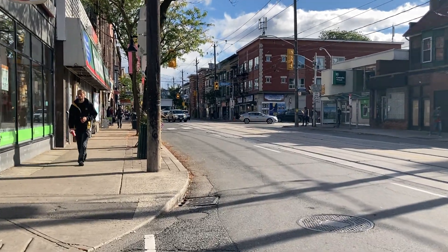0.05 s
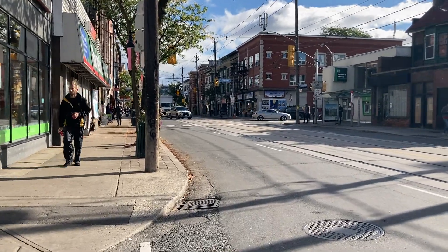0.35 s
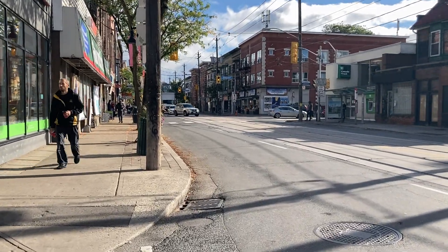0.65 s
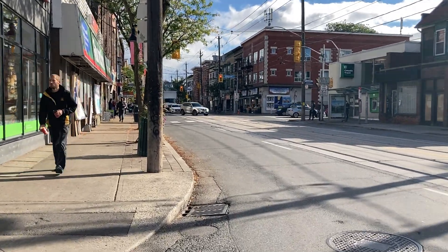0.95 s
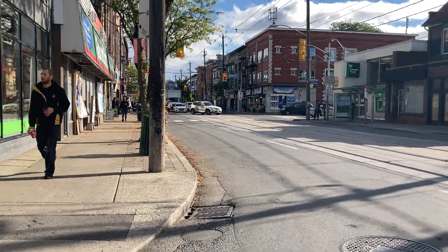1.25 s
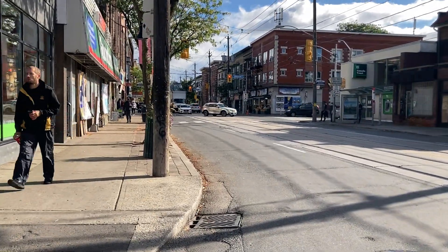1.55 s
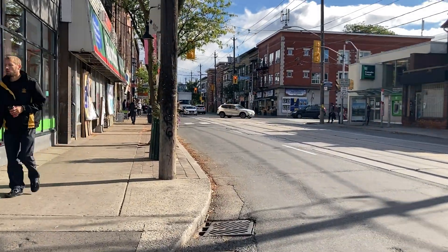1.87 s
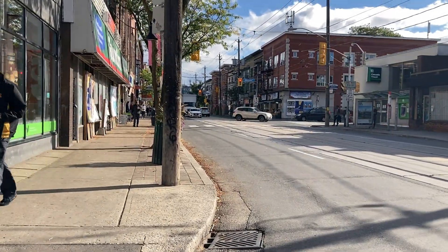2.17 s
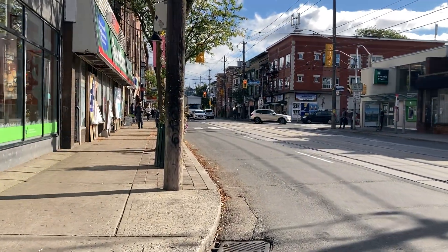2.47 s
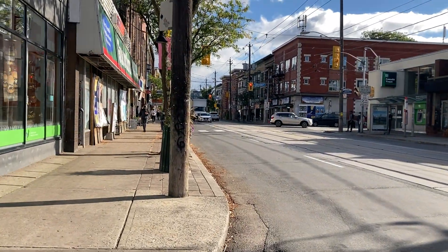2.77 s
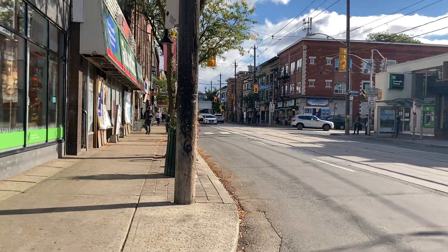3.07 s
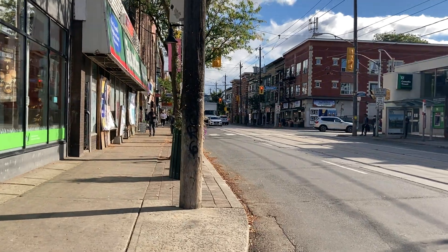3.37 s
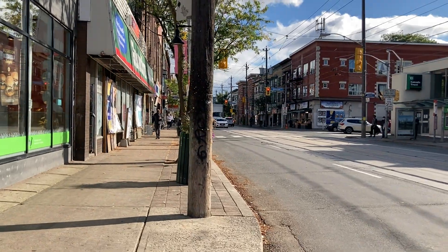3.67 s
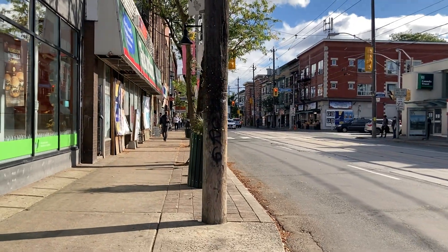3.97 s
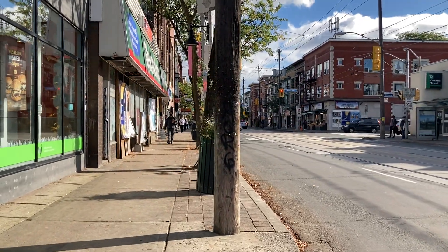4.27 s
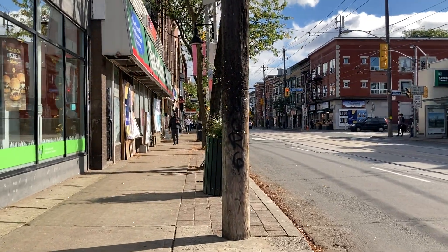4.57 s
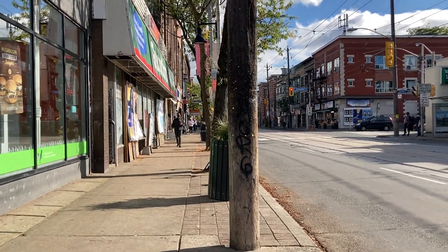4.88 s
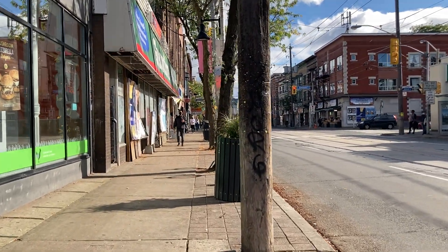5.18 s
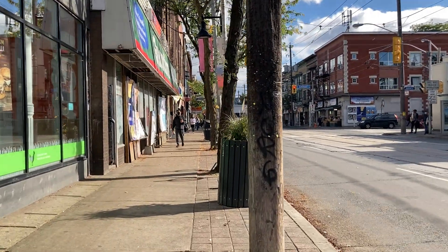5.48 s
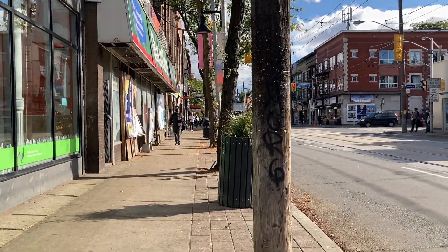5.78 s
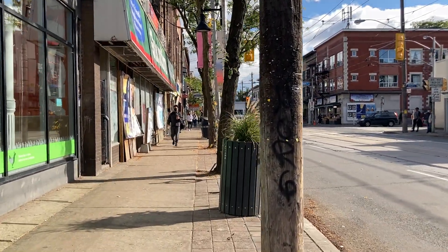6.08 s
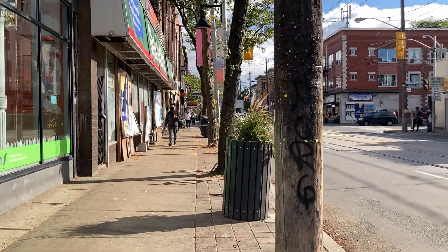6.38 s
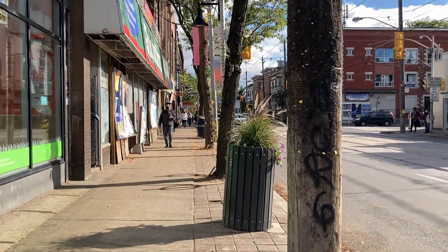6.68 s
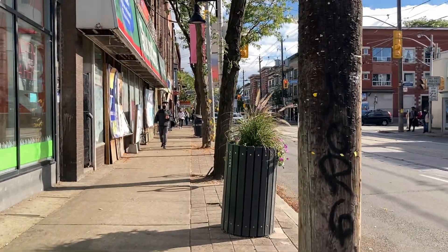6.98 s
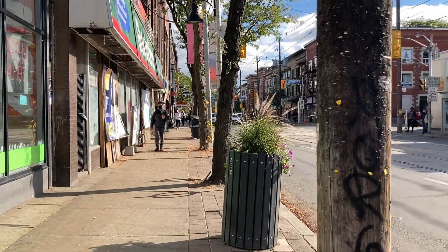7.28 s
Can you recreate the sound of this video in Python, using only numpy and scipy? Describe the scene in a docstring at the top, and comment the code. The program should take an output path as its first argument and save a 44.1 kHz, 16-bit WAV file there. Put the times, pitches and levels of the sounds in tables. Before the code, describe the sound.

Gusty wind hits the microphone with a low throb, rough flutter and pops, strongest in the first second and a half, then returning in lighter gusts. Close by, a walker's clothing swishes softly and a small metal zip pull tinkles irregularly. Distant city traffic rumbles underneath, a brake squeals faintly a couple of seconds in, and near the end one car comes slightly closer.

```python
"""A city sidewalk, walked in gusty wind.
Vortices shed at the microphone throb at a low wandering pitch, tear into rough flutter and pop.
Clothing swishes and hisses by friction; a small metal zip pull rings as it knocks against its slider.
Far traffic rumbles, a brake squeals faintly by stick-slip, and late on one car comes a little closer."""
import sys
import numpy as np
from scipy import signal
from scipy.fft import rfft, irfft, next_fast_len
from scipy.io import wavfile
from scipy.ndimage import uniform_filter1d

SR = 44100
rng = np.random.default_rng(int(sys.argv[2]) if len(sys.argv) > 2 else 0)


def digitize_waveform(pressure):
    """Quantize a signal to 16-bit integers and store it at the path in sys.argv[1].

    Rows of a 2-D input are taken as channels; values are limited to [-1, 1].
    """
    field = np.atleast_2d(pressure).T
    bounded = np.clip(field, -1, 1)
    quanta = np.round(bounded * 32767).astype(np.int16)
    wavfile.write(sys.argv[1], SR, quanta)


N = 323694
TIME = np.arange(N) / SR
USUAL_WIND_DB = -25   # reference for the strength of wind and turbulence

# the loudest eddy bursts, each part on its own relative scale: start_s, crack_db, thump_db, snap_db
POPS = [(0.223, -16, -32, -48), (0.397, -17.5, -38, -59), (0.485, -9.5, -23, -34), (0.495, -12.5, -13, -24),
        (0.543, -9.5, -22.5, -42), (0.579, -9, -1.5, -32), (0.623, -17, -9.5, -49), (0.652, -25, 1.5, -50),
        (0.728, -22.5, -2.5, -48), (0.797, -14, -24.5, -23), (0.89, -11.5, -15, -31),
        (0.898, -18, -16, -24.5), (0.957, -16, -16, -31), (0.968, -9.5, 2, -30), (1.056, -10, -22, -33),
        (1.17, -20.5, -6, -47), (1.232, -13.5, -35, -64), (1.283, -12.5, -5.5, -36),
        (1.313, -23, -25.5, -53), (1.339, -15, -21, -42.5), (1.359, -14, -4, -52),
        (1.506, -15.5, -31, -39.5), (1.534, -25, 4, -42), (1.58, -14, 2.5, -25), (2.365, -26, -17, -62),
        (2.996, -11, -2.5, -34.5), (5.394, -18.5, -11, -52), (5.555, -14, -19, -39), (5.57, -27, -1, -42),
        (5.781, -23.5, -21, -66), (6.213, -14.5, -5.5, -52), (6.382, -14.5, -8.5, -56),
        (6.468, -10, -22.5, -33), (7.065, -20.5, -26, -46)]


def from_db(db):
    """Decibels to amplitude ratio."""
    return 10 ** (np.asarray(db) / 20)


def rms_one(x):
    """Normalisation to rms 1."""
    return x / np.sqrt(np.mean(np.abs(x) ** 2) + 1e-20)


def in_time(rows):
    """Linear interpolation of each column of a timed table to every sample."""
    time_s, *columns = np.transpose(rows)
    return [np.interp(TIME, time_s, column) for column in columns]


def drift(rate_hz):
    """Smooth random fluctuation: noise low-passed at rate_hz, with rms 1."""
    pole = np.exp(-2 * np.pi * rate_hz / SR)
    return rms_one(signal.lfilter([1], [1, -2 * pole, pole * pole], rng.standard_normal(N + SR))[SR:])


def noise(colour):
    """Spectral shaping of white noise by rows of frequency_hz, relative_db; rms 1."""
    hz, level_db = np.transpose(colour)
    size = next_fast_len(N)
    bin_hz = np.maximum(np.arange(size // 2 + 1) * SR / size, 1)
    gain = from_db(np.interp(np.log(bin_hz), np.log(hz), level_db))
    return rms_one(irfft(rfft(rng.standard_normal(size)) * gain, size)[:N])


def evened(x, span_s):
    """Division by the running rms holds the level at 1 and keeps grain finer than span_s."""
    return x / np.sqrt(uniform_filter1d(np.abs(x) ** 2, max(int(span_s * SR), 2)) + 1e-9)


def clicks_at(times_s, level_db):
    """An impulse of the given level at each time."""
    clicks = np.zeros(N)
    clicks[np.clip(np.round(times_s * SR).astype(int), 0, N - 1)] = from_db(level_db)
    return clicks


def ring(clicks, hz, t60_s):
    """Damped resonator: a unit impulse starts a decaying sine of amplitude 1."""
    radius, angle = from_db(-60 / (t60_s * SR)), 2 * np.pi * hz / SR
    return signal.lfilter([0, np.sin(angle)], [1, -2 * radius * np.cos(angle), radius**2], clicks + 1e-18)


def dying(clicks, time_s):
    """Exponential decay: an envelope that jumps at each impulse and dies away."""
    return signal.lfilter([1], [1, -np.exp(-1 / (time_s * SR))], clicks + 1e-18)


def softened(x, hz):
    """Low-pass filtering rounds off everything above hz."""
    return signal.sosfilt(signal.butter(4, hz, fs=SR, output="sos"), x)


def airflow(gusty_db=2.0, gust_rate_hz=15.8):
    """Breeze and buffets add in power; the shedding rate is their power-weighted mean."""
    # breeze at the microphone: time_s, strength_db, shedding_hz
    breeze = [(0.0, -23, 130.3), (0.3, -21, 118.6), (0.42, -21.5, 155.4), (0.67, -37.5, 150.4),
              (1.11, -21, 200), (1.2, -28.5, 160.5), (1.48, -27, 128.5), (1.7, -22.5, 198.2),
              (1.9, -23.5, 177.9), (2.03, -38, 164), (2.16, -26.5, 172.1), (2.27, -35, 129.6),
              (2.5, -35.5, 151), (2.68, -32, 157.8), (3.1, -24, 145.5), (3.39, -35.5, 129.7),
              (3.44, -42.5, 125), (3.73, -33, 142), (4.0, -30, 162.2), (4.5, -32, 129.1),
              (5.12, -43, 111.8), (5.64, -26, 134.9), (5.72, -37.5, 122), (6.1, -28, 124),
              (6.52, -24, 153.3), (6.82, -39, 128.4), (7.34, -28, 137)]
    # single buffets on top of it: middle_s, strength_db, length_s, shedding_hz, extra_turbulence_db
    buffets = [(0.227, -25, 0.031, 94, 11.5), (0.497, -22, 0.019, 158.6, 11),
               (0.542, -13, 0.075, 158.2, 0.5), (0.659, -19, .08, 122.6, 2), (0.806, -12, .12, 189.5, 4.5),
               (0.896, -7.5, 0.063, 181.2, -1.5), (0.971, -17, 0.028, 161.4, 10.5),
               (1.018, -15, 0.078, 164.4, 2.5), (1.378, -15, 0.15, 123.3, -3.5),
               (1.552, -12, 0.1101, 140.1, 0), (1.903, -27, 0.075, 180.7, 9),
               (2.381, -21.5, .07, 112.7, -3.5), (2.895, -21, 0.038, 157.7, -3.5),
               (3.014, -19.5, 0.044, 149.7, -0.5), (3.608, -25, .08, 145.7, -6),
               (4.11, -19, 0.11, 128.6, -2), (4.205, -17, 0.048, 123, -19), (4.353, -24.5, 0.06, 150, -5.5),
               (4.597, -22, 0.076, 97, -16), (4.798, -22, 0.071, 147.9, -8.5),
               (4.9, -20.5, 0.076, 140.4, -12), (5.014, -28, 0.045, 99.2, -11),
               (5.25, -25.5, 0.082, 101.5, -3), (5.385, -23, 0.075, 82, 0), (5.49, -20, 0.054, 95.3, -4),
               (5.562, -15, 0.061, 148, -4), (5.644, -18, 0.036, 143.1, -7.5),
               (5.824, -20, 0.092, 137.9, -1.5), (6.308, -23, 0.047, 146.3, 1),
               (6.439, -15, 0.1, 171.3, -2.5), (7.097, -26.5, .1, 141.5, 0), (7.197, -20.5, 0.057, 147, -8)]
    breeze_db, breeze_hz = in_time(breeze)
    power = from_db(breeze_db) ** 2
    turbulence, weighted_hz = power, power * breeze_hz
    for middle_s, strength_db, length_s, hz, extra_db in buffets:
        buffet = (from_db(strength_db) * np.exp(-(2 * (TIME - middle_s) / length_s) ** 2)) ** 2
        power = power + buffet
        turbulence = turbulence + buffet * from_db(extra_db) ** 2
        weighted_hz = weighted_hz + buffet * hz
    offset_db = gusty_db * np.clip(drift(gust_rate_hz), -2, 1.5) - USUAL_WIND_DB
    return 10 * np.log10(power) + offset_db, 10 * np.log10(turbulence) + offset_db, weighted_hz / power


def shedding(hz, width_hz, span_s):
    """Vortex shedding: eddies leave an edge almost periodically, wandering in strength and phase."""
    wander = evened(drift(width_hz) + 1j * drift(width_hz), span_s)
    return np.sqrt(2) * np.real(wander * np.exp(2j * np.pi * np.cumsum(hz) / SR))


def flutter(eddies, turbulence_db, rough_db=-34, torn_db=-61, torn_growth=1.86, crest_db=3.0):
    """Turbulent noise comes in lumps, strongest on eddy crests; its tearing edge grows fastest."""
    # spectra of the rough flutter and the tearing edge: frequency_hz, relative_db
    rough_colour = [(110, -33.5), (200, 4), (300, -1), (450, -8), (700, -14.5), (1000, -21), (1500, -34),
                    (2500, -49.5), (5000, -79.5)]
    torn_colour = [(500, -11), (1000, 3.5), (1500, -3), (2200, -12.5), (3200, -22.5), (4500, -34.5),
                   (7000, -50), (14000, -53.5)]
    lumps = np.clip(drift(74), -2, 2)
    crests = from_db(crest_db * eddies)
    rough = evened(noise(rough_colour) * crests * from_db(2.5 * lumps), span_s=0.082)
    torn = evened(noise(torn_colour) * crests * from_db(6.0 * lumps), span_s=0.06)
    torn *= from_db(torn_db + torn_growth * turbulence_db)
    return from_db(rough_db + turbulence_db) * rough + torn


def wind(wind_db, turbulence_db, shedding_hz, wander_hz=6.0, push_db=-13.0):
    """Pressure fluctuations on the microphone: a vortex throb, turbulent flutter and a deep swell."""
    # slow pressure swell: time_s, level_db
    swell_curve = [(0.0, -39), (0.04, -26.5), (0.94, -26), (1.22, -27.5), (1.57, -25), (1.74, -39.5),
                   (2.86, -46), (3.0, -39), (3.21, -44.5), (5.58, -36), (6.05, -40), (6.4, -30),
                   (6.52, -39), (7.34, -38)]
    # its spectrum: frequency_hz, relative_db
    swell_colour = [(12, 19), (30, 13.5), (60, 17), (90, 15.5), (140, 13), (250, -51.5)]
    throb = from_db(USUAL_WIND_DB + wind_db + 0.13)
    eddies = shedding(shedding_hz + wander_hz * drift(7.37), width_hz=20.9, span_s=0.062)
    turbulence = flutter(eddies, turbulence_db) * stalls()
    swell_db, = in_time(swell_curve)
    pressure = np.hypot(from_db(swell_db), throb * from_db(push_db))   # strong gusts push harder
    return throb * eddies + turbulence + pressure * evened(noise(swell_colour), span_s=0.14)


def background(engines_db=-41.5, engine_waver_db=0.5, hiss_waver_db=2.5):
    """Broadband noise: far engines and tyres, plus the faint, wavering hiss of clothing close by."""
    # levels of the tyres and of the clothing's hiss: time_s, level_db
    tyre_curve = [(0, -50), (2, -55), (3.5, -56), (4.6, -55.5), (5.2, -56), (6, -53), (6.8, -54),
                  (7.34, -52.5)]
    cloth_curve = [(0.0, -67), (0.6, -70.5), (1.6, -64), (2.2, -64.5), (2.7, -61), (3.9, -66.5), (4.3, -75),
                   (4.8, -65), (5.1, -63), (5.6, -66), (6.3, -68.5), (6.75, -72), (7.34, -69)]
    # spectra of engines, tyres and the clothing's hiss: frequency_hz, relative_db
    engine_colour = [(20, -20), (50, 0.5), (90, 3), (125, -12.5), (200, -7), (350, -16.5), (600, -35),
                     (1500, -47.5)]
    tyre_colour = [(200, 6), (500, -14.5), (1000, -1.5), (1500, -9.5), (2200, -15), (3200, -25.5),
                   (5000, -25), (12000, -44)]
    cloth_colour = [(1500, 16), (3000, 8), (4500, 3), (6000, -9), (9000, -22), (12500, 11), (15500, -6)]
    tyres_db, = in_time(tyre_curve)
    cloth_db, = in_time(cloth_curve)
    engines = from_db(engines_db + engine_waver_db * drift(0.31)) * noise(engine_colour)
    cloth_hiss = from_db(cloth_db + hiss_waver_db * drift(9)) * noise(cloth_colour)
    return engines + from_db(tyres_db) * noise(tyre_colour) + cloth_hiss


def clothing(half_width_s=0.052, grain_db=2.5):
    """Sliding friction of fabric on fabric gives soft swells of fine, slightly grainy hiss."""
    # rubs with the stride: middle_s, level_db
    swishes = [(0.01, -61), (1.75, -63), (1.981, -58.5), (2.31, -65), (2.83, -65.5), (3.384, -65.5),
               (3.55, -64), (3.95, -64), (5.741, -66.5), (6.149, -67.5), (6.531, -66.5), (6.879, -69),
               (7.108, -70)]
    # their spectrum: frequency_hz, relative_db
    swish_colour = [(1200, -11), (2500, 1), (4000, 4.5), (6000, 2), (9000, 3.5), (12500, 7), (15500, -36)]
    rub = sum(from_db(db) * np.exp(-.5 * ((TIME - s) / half_width_s) ** 2) for s, db in swishes)
    return rub * from_db(grain_db * drift(91)) * noise(swish_colour)


def stalls(depth_db=-4.0, length_s=0.0048):
    """Amplitude modulation: the flow slackens for an instant before each loud burst."""
    nearness = sum(np.exp(-.5 * ((TIME - start_s + length_s) / length_s) ** 2) for start_s, *_ in POPS)
    return from_db(depth_db * np.minimum(nearness, 1))


def small_pops(turbulence_db, per_s=8, level_db=-32):
    """Lesser eddies burst as a Poisson process: one impulse each, scaled by the turbulence."""
    born = rng.random(N) < per_s / SR
    scatter_db = np.clip(rng.standard_normal(N), -2, 1.5)
    return born * from_db(level_db + turbulence_db - scatter_db)


def pops(turbulence_db, lag_s=0.0014):
    """A bursting eddy is a pressure pulse: a low thump, a dull crack and, in big ones, a bright snap."""
    # spectra of crack and snap: frequency_hz, relative_db
    crack_colour = [(150, -10), (400, 13.5), (1000, -2.5), (1700, -15), (2600, -37.5), (5000, -44.5)]
    snap_colour = [(800, -2), (1800, 4), (3000, -13.5), (4500, -24.5), (7000, -37), (14000, -39)]
    start_s, crack_db, thump_db, snap_db = np.transpose(POPS)
    small = small_pops(turbulence_db)
    thump = ring(clicks_at(start_s, thump_db - 1.0) + from_db(7.5) * small, hz=135, t60_s=0.031)
    leak = signal.butter(1, 45, "high", fs=SR, output="sos")   # steady pressure leaks away
    thump = signal.sosfilt(leak, thump)
    tear_s = start_s + lag_s   # the flow tears at the top of the thump
    tears = from_db(-8.5) * (clicks_at(tear_s, crack_db) + small)
    crack = dying(tears, time_s=0.0038) * evened(noise(crack_colour), span_s=0.007)
    snap = dying(clicks_at(tear_s, snap_db - 2.5), time_s=0.0026)
    snap *= evened(noise(snap_colour), span_s=0.00068)
    return softened(thump + crack, hz=1840) + softened(snap, hz=5040)


def touches(faint_per_s=7.8, faint_db=-52, spread_db=1.5):
    """Impacts of the zip pull on its slider: clear ones at set times, faint ones as a Poisson process."""
    # clear touches: start_s, strength_db, lower_modes_extra_db
    jingles = [(0.3242, -42, -10), (0.8928, -42, 5.5), (0.9997, -41, -16), (1.0649, -32, -4),
               (1.1079, -44, 9), (1.2795, -41, -6), (1.5927, -39.5, 6), (2.2057, -36, -11),
               (2.6843, -43.5, 9), (3.1303, -32.5, -3), (3.2046, -44, -5), (3.8626, -43, -1),
               (4.1714, -37, -4), (4.345, -40, -9), (4.5506, -42, -12), (4.9317, -39.5, 4),
               (5.4135, -39, 3), (5.4575, -42, 4), (5.6017, -39.5, -5), (5.6461, -42.5, 1),
               (5.7728, -47, 1), (5.9364, -47, 2), (6.5863, -39.5, 0), (6.8728, -45, 0), (7.1187, -44, 0)]
    gap, strength, body = rng.random((120, 3)).T
    start_s = np.cumsum(-np.log(1 - gap)) / faint_per_s
    faint = np.c_[start_s, faint_db + spread_db * (2 * strength - 1), spread_db * (2 * body - 1)]
    return np.r_[jingles, faint[start_s < N / SR]]


def zip_pull(ring_db=-6.5, tick_db=-13.5, scatter_db=3.0, detune=0.0047, t60_scale=0.76, rise_s=0.00086):
    """Modal ringing: each touch ticks and excites the modes, which vary with the way the pull hangs."""
    # modes of the pull: pitch_hz, relative_db, nominal_t60_s
    zip_modes = [(5330, -25, .14), (7620, -21, .12), (9600, -12, .08), (12800, -7, .07), (13020, -3, .08),
                 (15680, -11, .05)]
    start_s, strength_db, body_db = touches().T
    hz, mode_db, t60_s = np.transpose(zip_modes)[:, :, None]
    lower = hz < 11000
    age_s = TIME[:SR // 8]
    ringing = np.zeros(N + len(age_s))
    for touch_s, touch_db, extra_db in zip(start_s, strength_db, body_db):
        strength, shift, stretch_db = np.clip(rng.standard_normal((3, len(hz), 1)), -2, 2)
        decay = from_db(-60 * age_s / (t60_scale * t60_s * from_db(stretch_db)))
        envelope = decay * (1 - np.exp(-age_s / rise_s))
        gains = from_db(mode_db + extra_db * lower + scatter_db * strength)
        modes = gains * envelope * np.sin(2 * np.pi * hz * (1 + detune * shift) * age_s)
        at = int(touch_s * SR)
        ringing[at:at + len(age_s)] += from_db(touch_db + ring_db) * modes.sum(axis=0)
    contact = dying(clicks_at(start_s, strength_db + tick_db), time_s=0.0056)
    ticks = contact * noise([(4000, -19.5), (8000, -15.5), (13000, 3), (16000, -7.5), (19000, -24)])
    return ringing[:N] + ticks


def brake(pitch_hz=5170, rise_hz=106.9, settle_s=0.053, waver_hz=17.0, stutter_db=5):
    """Stick-slip friction: a far brake disc sings one thin note that stutters as the pad grips."""
    # the squeal: time_s, level_db
    squeal = [(2.02, -86), (2.1, -66), (2.22, -64.5), (2.41, -61), (2.54, -69.5), (2.66, -55), (2.75, -70),
              (2.9, -65), (3.03, -88)]
    squeal_db, = in_time(squeal)
    start_s, end_s = squeal[0][0], squeal[-1][0]
    hz = pitch_hz - rise_hz * np.exp(-np.maximum(TIME - start_s, 0) / settle_s)   # rises as the pad bites
    stutter = from_db(stutter_db * np.clip(drift(35), -3, 1))
    note = np.sqrt(2) * np.sin(2 * np.pi * np.cumsum(hz + waver_hz * drift(47.84)) / SR)
    braking = (TIME > start_s) & (TIME < end_s)
    return from_db(squeal_db) * stutter * note * braking


def nearer_car(level_db=-55.5, middle_s=6.98, half_width_s=0.38):
    """Level rises with nearness: one car comes closer, its tyres brighter than the rest of the street."""
    nearness = np.exp(-.5 * ((TIME - middle_s) / half_width_s) ** 2)
    tyres = noise([(500, -33), (900, 2), (1300, -3), (1700, -10.5), (2500, -13.5), (6000, -48.5)])
    return from_db(level_db) * nearness * tyres


def scene():
    """Superposition in one channel: wind on the microphone, the walker close by, the street behind."""
    wind_db, turbulence_db, shedding_hz = airflow()
    gusts = wind(wind_db, turbulence_db, shedding_hz) + pops(turbulence_db)
    return (gusts + clothing() + background() + brake() + zip_pull() + nearer_car())[None, :]


def record(dry):
    """Saturation: the strongest gusts overload the input, and a steep low-pass cuts the top."""
    ceiling, cutoff_hz = .7, 15750
    clipped = dry / (1 + (dry / ceiling) ** 12) ** (1 / 12)
    return signal.sosfilt(signal.ellip(10, .2, 80, cutoff_hz, fs=SR, output="sos"), clipped)


dry = scene()
out = record(dry)
digitize_waveform(out)
```